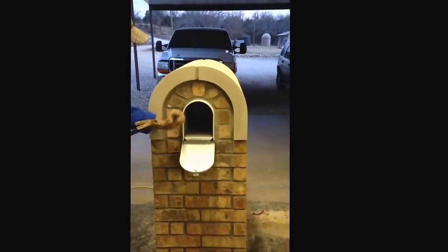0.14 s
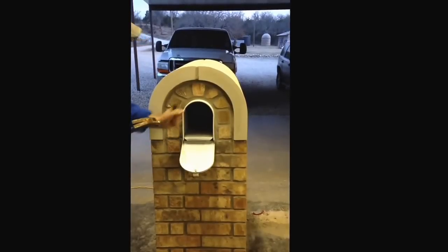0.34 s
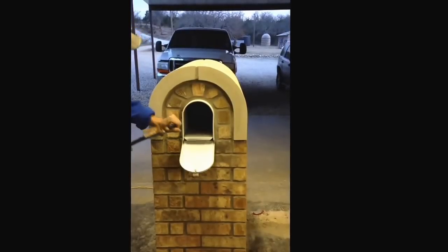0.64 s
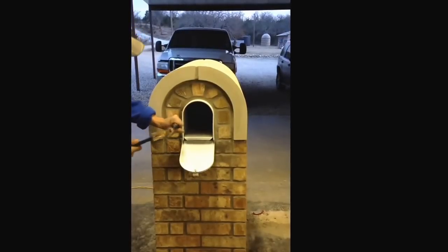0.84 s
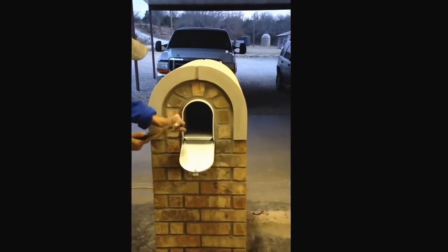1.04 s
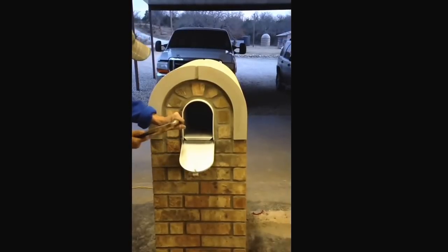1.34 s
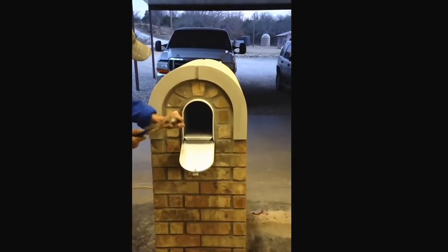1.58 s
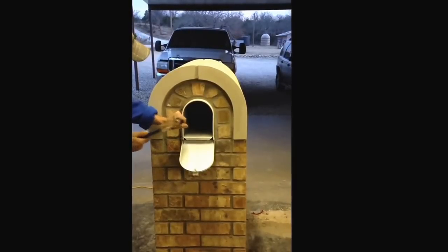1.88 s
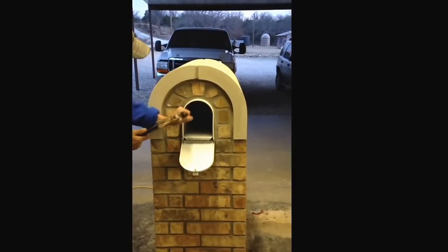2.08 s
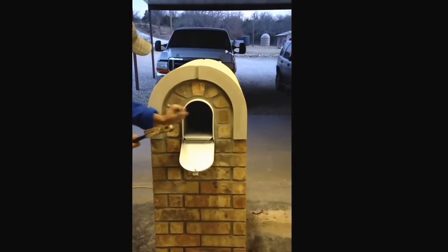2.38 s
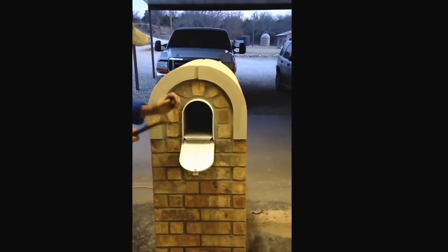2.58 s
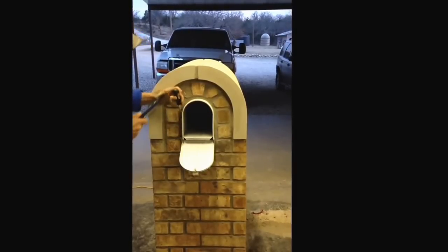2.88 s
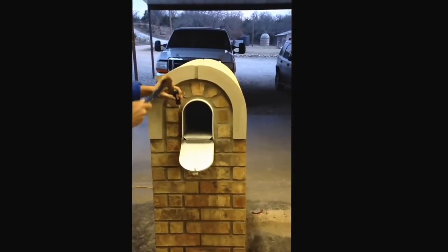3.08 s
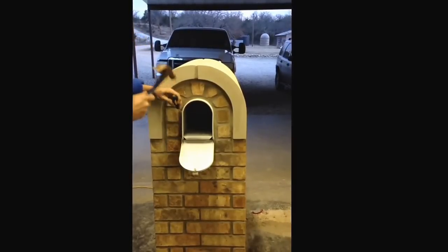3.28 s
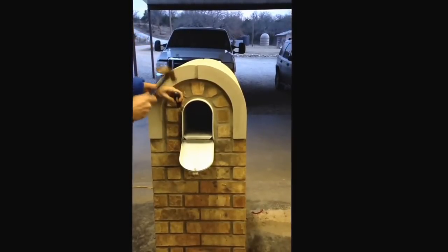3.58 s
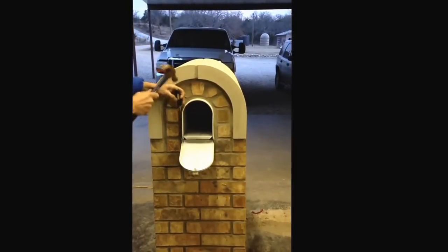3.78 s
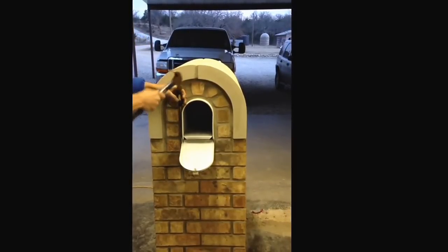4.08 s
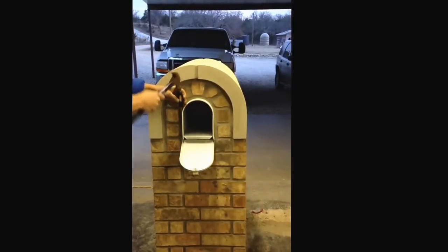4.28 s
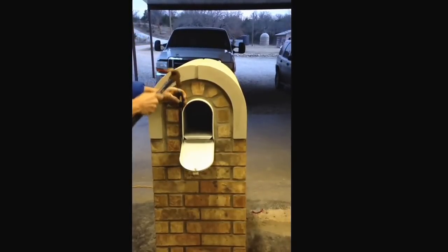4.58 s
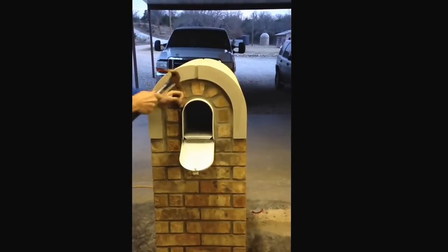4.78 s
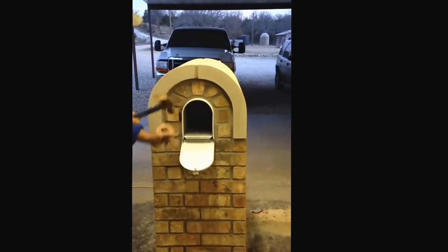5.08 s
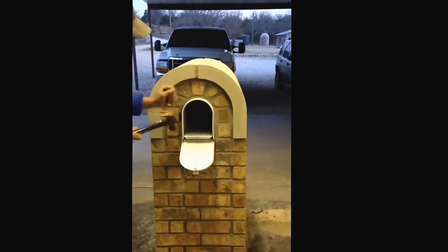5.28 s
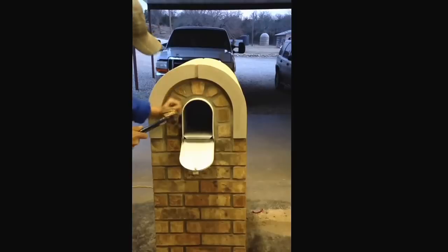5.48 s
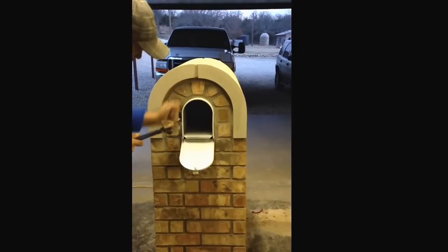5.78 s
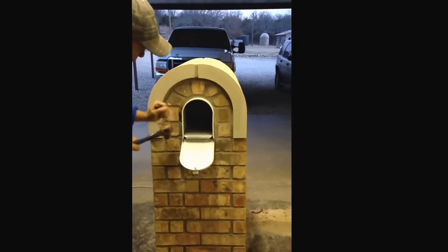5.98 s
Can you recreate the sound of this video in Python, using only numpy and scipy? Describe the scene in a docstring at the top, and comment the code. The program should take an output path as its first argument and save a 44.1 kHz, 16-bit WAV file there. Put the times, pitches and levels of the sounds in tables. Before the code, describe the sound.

Sharp metallic blows on brickwork make a hollow steel box ring, broken by steel scrapes, snapping fragments and a brief hoarse squeal.

```python
"""A hammer drives a chisel against the brickwork round a steel mailbox, under a carport roof.
First come a dying hollow ring and soft scrapes, a blow and a light tap, then four hard blows and a skid.
Tools clink and steel scrapes on brick; then seven quick blows crack brick, crush mortar and ring the box.
Loose pieces snap among more scrapes and a short hoarse squeal, and two more blows end the scene.
Crumbs tick, the carport echoes and the outdoors rumbles faintly throughout."""
import sys
import numpy as np
from scipy import signal
from scipy.fft import rfft, irfft
from scipy.io import wavfile
from scipy.ndimage import uniform_filter1d, map_coordinates

SR = 44100
rng = np.random.default_rng(int(sys.argv[2]) if len(sys.argv) > 2 else 0)


def bounce(signal):
    """Save signal as a 16-bit WAV file at the path given by the first command-line argument."""
    frames = np.transpose(np.atleast_2d(signal))
    limited = np.clip(frames, -1, 1)
    pcm = np.round(limited * 32767).astype(np.int16)
    wavfile.write(sys.argv[1], SR, pcm)


N = 270774   # length in samples
BAND_HZ = 50 * 2 ** (np.arange(26) / 3)   # centres of third-octave bands
HALF_BAND = 2 ** (1 / 6)   # ratio from a band's centre to its edge


def from_db(db):
    """Turn decibels into gain."""
    return 10 ** (np.asarray(db) / 20)


def rms_one(x):
    """Scale to an rms (average strength) of 1."""
    return x / np.sqrt(np.mean(x ** 2) + 1e-20)


def at_hz(points, hz, axis=1):
    """Read one column of a table between its rows, on a log-frequency axis."""
    points = np.array(points)
    return np.interp(np.log(hz), np.log(points[:, 0]), points[:, axis])


def noise_bands(size):
    """Make steep third-octave bands of unrelated noise, each with rms 1."""
    bands = []
    for hz in BAND_HZ:
        edges = [hz / HALF_BAND, hz * HALF_BAND]
        sos = signal.butter(4, edges, "band", fs=SR, output="sos")
        bands.append(rms_one(signal.sosfilt(sos, rng.standard_normal(size))))
    return np.array(bands)


def grain(rough_db, size):
    """Uneven gain of sand grains breaking one after another, rms 1; size is in samples."""
    wobble = rms_one(uniform_filter1d(rng.standard_normal(N), size))
    return rms_one(from_db(rough_db * wobble))


def add(out, s, sound):
    """Mix a sound in from time s (seconds) on."""
    start = round(s * SR)
    sound = sound[:max(0, N - start)]
    out[start:start + len(sound)] += sound


def ring(modes, strength_db, t):
    """Add up the dying sines of a struck body, each with its own strength and random sign."""
    hz, db, t60 = np.array(modes).T[:, :, None]
    sign = rng.choice([-1, 1], hz.shape)
    level = from_db(db + strength_db[:, None] - 60 * t / t60)
    return np.sum(sign * level * np.sin(2 * np.pi * hz * t), axis=0)


# Hammer blows and light taps. The edge lands square, skids along the face, or stalls on hard
# brick without biting; the thud is the shock that reaches the pillar.
# Columns: start_s, force_db, skid (0-1), stall (0-1), thud_db
HAMMER_BLOWS = [(0.268, -4, 0.21, 0.28, -9.5), (0.662, -30.5, 0, 0.47, -1), (1.1145, 0, 0.4, 0.96, 4.5),
                (1.382, 2.5, 0.21, 0.53, -2.5), (1.628, 2, 0.2, 0.28, -0.5), (1.8361, -1, 0, 0.16, 0),
                (2.3701, -1, 1, 0, -2), (3.3445, -3, .08, 0.04, -2.5), (3.6059, 0.5, 0.12, 0.02, -3.5),
                (3.8128, -2, 0.29, 0.11, 6), (4.02, -1, 0.31, 0.03, 5), (4.2202, -2.5, 0.4, 0.03, 3.5),
                (4.428, -2.5, 0.24, 0.04, 11.5), (4.61, -2, 0.13, 0.05, 10), (5.7095, 1, 0.96, 0.19, -10),
                (6.1233, -4.5, 0.86, 0.52, -2)]
# Crack of the brickwork; t60_s is the time to die by 60 dB.
# Columns: pitch_hz, level_db (per third octave), t60_s
BRICK_CRACK = [(60, -14, 0.35), (130, -28.5, 0.063), (180, -15.5, 0.25), (330, -6, 0.023),
               (475, -1.5, 0.049), (700, -1.5, 0.02), (1250, 1.5, 0.06), (2550, -3, 0.061),
               (3140, -6, 0.097), (6800, -11.5, 0.05), (9900, -1, 0.1), (13600, -46.5, 0.027)]
# Crushed mortar. Columns: pitch_hz, level_db (per third octave)
MORTAR_CRUNCH = [(100, -16), (600, -12.5), (1500, -35.5), (4000, -10), (7500, -4), (10000, -17),
                 (15000, -4)]
CRUNCH_S, SKID_CRUNCH_S = 0.01, 0.0011   # time the mortar takes to give way; extra for a full skid
STALL_CUTS_S = 0.0019   # a full stall shortens the crunch by this much


def blows(build_cycles=1.0, snap_db=2.5, snap_s=0.0089, rough_db=1.5, crunch_db=-0.5, patchy_db=4.5):
    """A sharp crack in the brick, then a few milliseconds of mortar giving way under the edge."""
    t = np.arange(SR // 5) / SR
    hz = BAND_HZ[:, None]
    # low notes of the masonry take longer to build up
    build_up = 1 - np.exp(-t * hz / build_cycles)
    crack = from_db(at_hz(BRICK_CRACK, hz) - 60 * t / at_hz(BRICK_CRACK, hz, axis=2)) * build_up
    crunch_tone = from_db(at_hz(MORTAR_CRUNCH, BAND_HZ))
    first_touch = np.exp(-t / snap_s)
    noise = noise_bands(len(HAMMER_BLOWS) * len(t)).reshape(len(hz), len(HAMMER_BLOWS), -1)
    cracks, crunches = np.zeros(N), np.zeros(N)
    for k, (s, force_db, skid, stall, thud_db) in enumerate(HAMMER_BLOWS):
        bands = from_db(blow_db(hz, force_db, skid, stall, thud_db)) * noise[:, k]
        # the first touch is harder with a stall and softer with a skid
        snap = from_db(snap_db * (1 + stall - skid) * first_touch)
        add(cracks, s, np.sum(bands * crack, axis=0) * snap)
        age = t / (CRUNCH_S + SKID_CRUNCH_S * skid - STALL_CUTS_S * stall)
        swell_and_fade = np.sqrt(2 * np.e * age) * np.exp(-age)
        # the same noise, played backwards, serves for the crunch
        add(crunches, s, crunch_tone @ bands[:, ::-1] * swell_and_fade)
    rough_cracks = cracks * grain(patchy_db, size=50)
    return rough_cracks + from_db(crunch_db) * crunches * grain(rough_db, size=20)


# Tone of a blow.
# Columns: pitch_hz, square_db, skid_db (added by a full skid), stall_db (added by a full stall)
TONE_OF_BLOW = [(90, -31.5, -21.5, 8), (165, -24, -4.5, 0), (235, -23, -10.5, -1.5), (434, -39.5, -0.5, 17),
                (465.3, -25.5, 7.5, -0.5), (760, -19, -8.5, 5), (1460, -15.5, -5.5, -10),
                (2380, -14, -4.5, 8.5), (3240, -14.5, 2.5, -6.5), (11600, -16, 3.5, -22.5)]


def blow_db(hz, force_db, skid, stall, thud_db, thud_hz=300):
    """A skid trades knock for hollow ring, a stall trades grit for clank; the thud shifts the bass."""
    square, skidding, stalling = (at_hz(TONE_OF_BLOW, hz, axis=k) for k in (1, 2, 3))
    bass = 1 / (1 + (hz / thud_hz) ** 4)
    return force_db + square + skid * skidding + stall * stalling + thud_db * bass


# Ringing notes (modes) of the steel box in its brick pillar. Columns: pitch_hz, level_db, t60_s
BOX_MODES = [(82.7, -7.5, 1.0), (102.4, -12.5, 0.5), (164.9, -11, 0.55), (179.4, -5.5, 0.34),
             (209.2, -5, 0.15), (237.2, -6, 0.76), (268.7, 1, 0.7), (415.4, -0.5, 1), (459, -7, 1.0),
             (502, -2, .5), (494, -3, 0.39), (540.6, -8.5, 0.28), (725, -20.5, 0.4), (789, -6, 0.28),
             (1025, 12, 0.033), (1155, -7.5, 0.2), (1408, 3.5, 0.043), (1547, -6, 0.23),
             (2175, -18.5, 0.44), (2200, -9, 0.12), (2380, -11, .35), (2600, -44, 0.55), (2700, -38, 0.25),
             (2700, -49, 0.35)]


def box(friction, scatter_db=1.5, build_s=0.0021, rubbed_db=29, detune=0.00547,
        skid_frees=0.37, stall_damps=0.37):
    """Shocks and friction pass through the mortar into the hollow box, which rings on."""
    out, t = np.zeros(N), np.arange(SR) / SR
    count = len(BOX_MODES)
    for s, *blow in HAMMER_BLOWS:
        modes = np.array(BOX_MODES)
        # pressure on the brick shifts each mode a little from blow to blow
        modes[:, 0] *= 1 + detune * rng.standard_normal(count)
        # a stalled edge presses on the box and damps it; a skidding one lets it ring
        _, skid, stall, _ = blow
        modes[:, 2] *= np.exp(skid_frees * skid - stall_damps * stall)
        strength = blow_db(modes[:, 0], *blow) + scatter_db * rng.standard_normal(count)
        add(out, s, ring(modes, strength, t) * (1 - np.exp(-t / build_s)))
    for hz, db, t60 in BOX_MODES:
        # under steady rubbing, the longer a mode rings the more it builds up
        q = np.pi * hz * t60 / np.log(1000)
        b, a = signal.iirpeak(hz, q, SR)
        out += from_db(db + rubbed_db) * t60 * signal.lfilter(b, a, friction)
    return out


# Scraping strokes; the first row is the hollow ring of an earlier blow.
# hollow_db raises or lowers the hollow note of the bricks by the box.
# Columns: peak_s, level_db, pressure (0-1), swell_s, fade_s, hollow_db
STROKES = [(0.01, -36.5, 0.97, 0.075, 0.036, 25.5), (0.065, -34.5, 0, 0.0053, 0.051, 6),
           (0.179, -42, 0.12, 0.016, 0.068, 1), (0.265, -27.5, 0.4, 0.0043, 0.033, 7.5),
           (2.105, -41, 0.13, 0.024, 0.0084, -31), (2.188, -42.5, 0, 0.0096, 0.024, 4),
           (2.248, -40, 0.02, 0.0022, 0.037, 3.5), (2.355, -21.5, 0.58, 0.0078, 0.062, 0),
           (2.757, -22.5, 0.9, 0.0036, 0.021, -3.5), (2.871, -20, 0.87, 0.029, 0.014, 0),
           (2.994, -25.5, 0.84, 0.015, 0.0075, -8), (3.171, -20.5, 0.95, 0.002, 0.033, 4),
           (3.201, -14.5, 0.57, 0.0075, 0.013, 3), (4.881, -33.5, 0, 0.075, .05, 2),
           (4.944, -8.5, 0.43, 0.017, 0.014, 0), (5.214, -43, 0, 0.0036, 0.28, -34),
           (5.376, -17.5, 0.84, 0.032, 0.049, 3), (5.486, -31.5, 0.1, 0.03, .012, -1),
           (5.641, -33, 0, 0.016, 0.036, -19), (5.664, -19, 0.8, 0.0012, 0.044, -4.5),
           (5.6979, -6, 0.6, 0.00033, 0.006, -5)]
# Steel sliding over brick. Columns: pitch_hz, level_db (per third octave)
BRICK_RASP = [(60, -42.5), (120, -42), (180, -20.5), (270, -19), (350, -29), (490, -7.5), (720, -22),
              (1400, -6.5), (3200, -9.5), (5000, -10), (8000, -11.5), (15000, -18.5)]
# A light stroke hisses over the dust, a hard one rasps. Columns: pitch_hz, light_db, hard_db
STROKE_TONE = [(470, -13, -16), (2050, -7, -8.5), (4380, 0.5, 0.5), (11100, 8.5, -11.5)]


def scrapes(rough_db=1.68, catch_db=2.0, hollow_hz=470, hollow_width=0.89):
    """Each row swells and fades; sand grains roughen it and each band catches and slips by itself."""
    t, power = np.arange(0, N, 16) / SR, 0   # loudness is worked out every 16 samples
    light, hard = at_hz(STROKE_TONE, BAND_HZ), at_hz(STROKE_TONE, BAND_HZ, axis=2)
    rasp = at_hz(BRICK_RASP, BAND_HZ)
    # bricks next to the box sound hollow
    hollow = np.exp(-(np.log(BAND_HZ / hollow_hz) / hollow_width) ** 2)
    for s, db, pressure, swell, fade, hollow_db in STROKES + dust_slides():
        stroke = np.exp(-np.abs(t - s) / np.where(t < s, swell, fade))
        tone = light + pressure * (hard - light) + hollow_db * hollow
        power = power + np.outer(from_db(db + tone + rasp), stroke) ** 2
    catching = rms_one(uniform_filter1d(rng.standard_normal(power.shape), size=24))
    gains = np.sqrt(power) * from_db(catch_db * catching)
    every_sample = np.arange(N) / SR
    friction = np.zeros(N)
    for band, gain in zip(noise_bands(N), gains):
        friction += band * np.interp(every_sample, t, gain)
    return wall_reflection(friction * grain(rough_db, size=24))


DUST_DELAY_S, DUST_DB, DUST_SPREAD_S = 0.21, -42.5, 0.1   # dust slides down a moment after a blow
DUST_LOSS_DB = 31   # less dust when the edge skids or stalls


def dust_slides():
    """The dust of each blow slides down the brick like a stroke with no pressure; a square bite sheds most."""
    slides = []
    for s, force_db, skid, stall, _ in HAMMER_BLOWS:
        level_db = DUST_DB + 2 * force_db - DUST_LOSS_DB * (skid + stall)
        slides.append((s + DUST_DELAY_S, level_db, 0, DUST_SPREAD_S, DUST_SPREAD_S, 0))
    return slides


def wall_reflection(x, share=0.34, delay_s=0.001213, sway=0.226):
    """The brick face mirrors the sound; as the hand moves, the comb of peaks slides."""
    n, knots = np.arange(N), np.arange(0, N + SR, SR // 8)
    hand = np.interp(n, knots, rng.standard_normal(len(knots)))
    delay = delay_s * SR * np.exp(sway * hand)
    mirrored = map_coordinates(x, [n - delay], order=3)   # reads between samples
    return (x + share * mirrored) / np.hypot(1, share)


# Steel juddering over brick. Columns: time_s, level_db, slips_per_s
JUDDER_PATH = [(5.336, -52, 830), (5.355, -18, 510), (5.371, -24.5, 680), (5.406, -27, 470),
               (5.440, -36, 740)]
SLIP_JITTER = 0.04   # unevenness of the slip rate, as a fraction


def judder(low_hz=2800, high_hz=7000):
    """The edge sticks and slips almost regularly, which gives the scrape a hoarse squeal."""
    t = np.arange(N) / SR
    s, db, rate = np.array(JUDDER_PATH).T
    unsteady = 1 + SLIP_JITTER * rms_one(uniform_filter1d(rng.standard_normal(N), size=60))
    slip_count = np.floor(np.cumsum(np.interp(t, s, rate) * unsteady) / SR)
    slips = np.diff(slip_count, prepend=0)   # one click per slip
    sos = signal.butter(2, [low_hz, high_hz], "band", fs=SR, output="sos")
    squeal = rms_one(signal.sosfilt(sos, slips))
    return squeal * from_db(np.interp(t, s, db)) * (t > s[0]) * (t < s[-1])


# Tools touching. Columns: start_s, level_db
TOOL_CLINKS = [(2.6578, -9), (2.697, -20), (2.7522, -18)]
# Ringing notes of the chisel held in the hand. Columns: pitch_hz, level_db, t60_s
CHISEL_MODES = [(2750, -19, 0.027), (3320, -9, 0.013), (4830, 0.5, 0.015), (4770, -24.5, 0.39),
                (6600, -14, .012), (8200, -21, .016), (10600, -36, .01)]


def clinks(tick_db=-14, tick_t60=0.019):
    """Steel touches steel with a gritty tick; the hand quickly damps most of the ring."""
    out, t = np.zeros(N), np.arange(SR // 4) / SR
    b, a = signal.iirpeak(4000, 1, SR)
    for s, db in TOOL_CLINKS:
        grit = rms_one(signal.lfilter(b, a, rng.standard_normal(len(t))))
        tick = grit * from_db(db + tick_db - 60 * t / tick_t60)
        add(out, s, ring(CHISEL_MODES, np.full(len(CHISEL_MODES), db), t) + tick)
    return out


# Knocks and snaps of loose brick and mortar. Columns: start_s, level_db, pitch_hz (centre)
LOOSE_PIECES = [(0.686, -36, 2500), (3.130, -50, 8700), (4.973, -9, 460), (5.112, -10.5, 9200),
                (5.293, -20, 4200), (5.310, -15, 3600), (5.472, -14.5, 4360), (5.489, -13, 1290),
                (5.659, -7, 2980), (5.681, -8.5, 2860), (5.889, -19, 4700), (6.065, -32, 4170)]
CHIP_T60_S, CHIP_SIZE_LAW = 0.012, 0.27   # ring of a 1 kHz piece; it shortens with pitch to this power


def chips(q=0.87):
    """Dry snaps, each a short noise burst passed twice through one broad resonance."""
    out, t = np.zeros(N), np.arange(SR // 20) / SR
    for s, db, hz in LOOSE_PIECES:
        t60 = CHIP_T60_S / (hz / 1000) ** CHIP_SIZE_LAW
        b, a = signal.iirpeak(hz, q, SR)
        once = signal.lfilter(b, a, rng.standard_normal(len(t)))
        snap = rms_one(signal.lfilter(b, a, once))
        add(out, s, snap * from_db(db - 60 * t / t60))
    return out


def crumbs(per_s=90, drive_db=-62.02, spread_db=3.0, low_hz=3000):
    """Grains of mortar trickle down as faint ticks of noise at random moments."""
    falls = rng.random(N) < per_s / SR
    size_db = spread_db * np.minimum(rng.exponential(1, N), 4)   # few grains are big
    hits = falls * from_db(drive_db + size_db)
    fading = signal.lfilter([1], [1, -.96], hits)   # each tick dies away
    ticks = fading * rng.standard_normal(N)
    return signal.sosfilt(signal.butter(2, low_hz, "high", fs=SR, output="sos"), ticks)


# Echo of the carport. Columns: pitch_hz, echo_db, t60_s
CARPORT_ECHO = [(74, -6, 1), (262, 5.5, 0.46), (458, 7, 0.45), (1100, -2, 0.69), (2380, -5.5, 0.56),
                (3700, -7, 0.52), (7740, -12, 0.38), (15000, -13, 0.29)]


def carport(x, build_s=0.006, turns_per_s=0.458):
    """Roof, slab and walls return a dense echo with short treble; its pattern shifts as the worker moves."""
    t, hz = np.arange(SR) / SR, BAND_HZ[:, None]
    build_up = 1 - np.exp(-(t / build_s) ** 2)
    decay = from_db(-60 * t / at_hz(CARPORT_ECHO, hz, axis=2)) * build_up
    share = hz * (HALF_BAND - 1 / HALF_BAND) / (SR / 2)   # each band's part of the whole range
    out, angle = 0, 2 * np.pi * turns_per_s * np.arange(N) / SR
    # two unrelated echoes take turns
    for weight in (np.cos(angle), np.sin(angle)):
        tails = noise_bands(SR) * decay
        tails = tails * np.sqrt(share / np.sum(tails ** 2, axis=1, keepdims=True))
        echo = np.sum(tails * from_db(at_hz(CARPORT_ECHO, hz)), axis=0)
        out = out + signal.fftconvolve(x * weight, echo)[:N]
    return out


# Outdoor background. Columns: pitch_hz, level_db (per Hz)
OUTDOOR_TONE = [(30, -36), (65, 3.5), (100, -5.5), (250, -6.5), (400, -11.5), (800, -19), (4000, -27.5),
                (15000, -36)]
AIR_DB = -58   # rms level


def air():
    """Faint steady rumble and hiss of the outdoors: noise shaped by pitch."""
    hz = np.maximum(np.fft.rfftfreq(N, 1 / SR), 1)
    spectrum = rfft(rng.standard_normal(N)) * from_db(at_hz(OUTDOOR_TONE, hz))
    return from_db(AIR_DB) * rms_one(irfft(spectrum, N))


def scene(small_echo_db=-6, box_db=-1.5):
    """Work on the brick fills the carport; the small near sounds stay drier."""
    friction = scrapes() + judder()
    work = blows() + friction
    small = clinks() + chips() + crumbs()
    ringing = from_db(box_db) * box(friction)
    echo = carport(work + from_db(small_echo_db) * small)
    return (work + small + ringing + echo + air())[None]


CUTOFF_HZ = 15450   # top of the range that is kept


def record(dry, low_cut_hz=45):
    """The microphone sheds the deepest bass, the loudest peaks are rounded and the top is cut."""
    heard = signal.sosfilt(signal.butter(2, low_cut_hz, "high", fs=SR, output="sos"), dry)
    rounded = heard / (1 + (heard / .9) ** 4) ** .25   # stays below 0.9
    return signal.sosfilt(signal.ellip(10, .1, 80, CUTOFF_HZ, fs=SR, output="sos"), rounded)


dry = scene()
out = record(dry)
bounce(out)
```